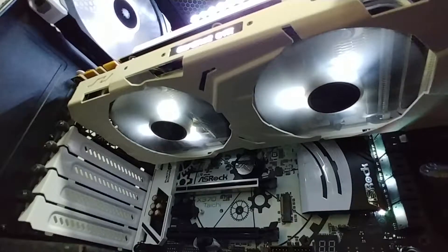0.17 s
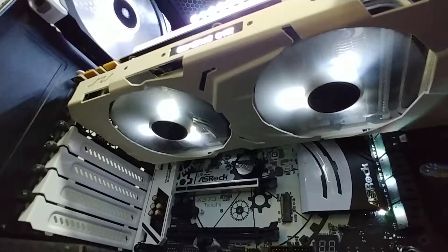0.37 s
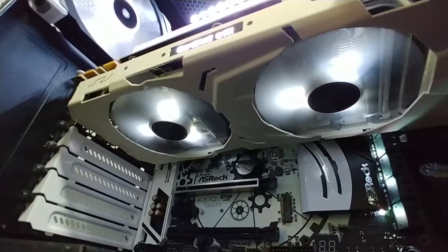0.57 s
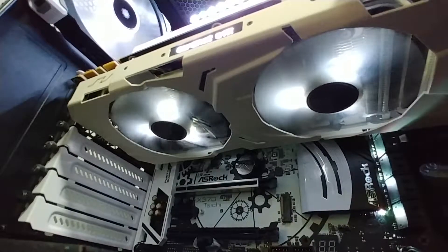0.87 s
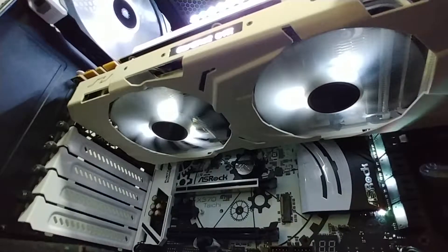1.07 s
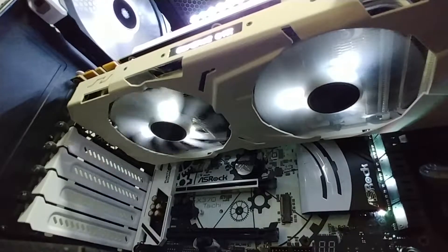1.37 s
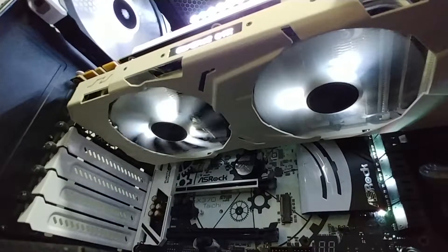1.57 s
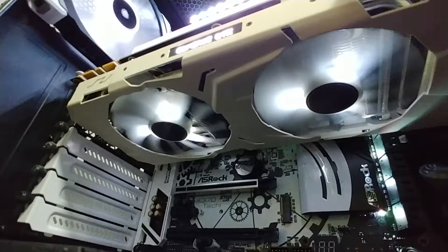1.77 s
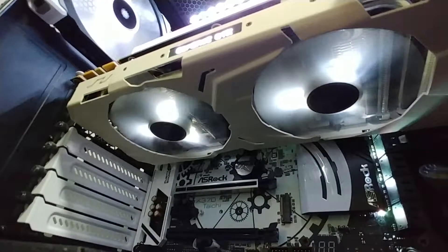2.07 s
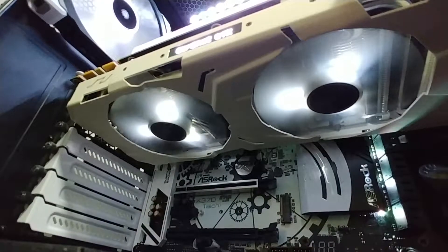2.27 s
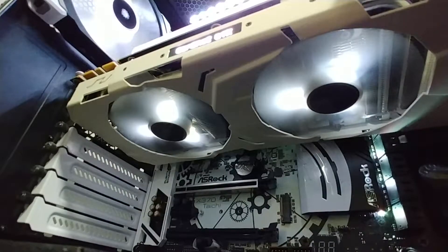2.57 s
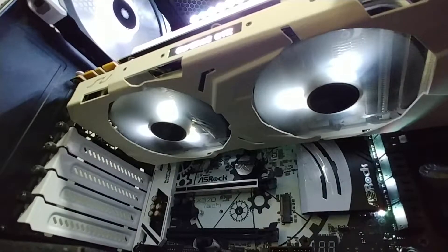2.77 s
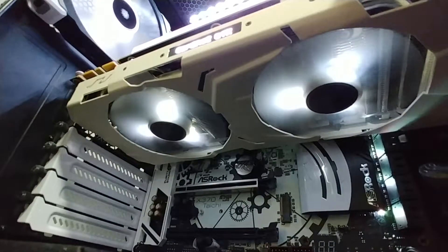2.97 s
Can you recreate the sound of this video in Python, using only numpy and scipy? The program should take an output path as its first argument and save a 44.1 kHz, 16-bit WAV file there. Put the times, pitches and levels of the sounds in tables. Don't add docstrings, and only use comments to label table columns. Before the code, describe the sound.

Computer cooling fans whir steadily up close, with two brief rattles of a clipping blade.

```python
import sys
import numpy as np
from scipy import signal
from scipy.fft import rfft, irfft, next_fast_len
from scipy.io import wavfile

SR = 44100
rng = np.random.default_rng(int(sys.argv[2]) if len(sys.argv) > 2 else 0)


def boost(x):
    u = np.asarray(x, float) / 20
    return 10 ** u


def materialize(psi):
    bounded = np.clip(np.atleast_2d(psi).T, -1, 1)
    quanta = np.round(bounded * 32767).astype(np.int16)
    wavfile.write(sys.argv[1], SR, quanta)


N = 138033

# start_s, peak_db, brightness_db_per_octave, face_knock_db
CLOCK_TICKS = [
    (0.601, -39.5, -1.5, 2),
    (1.5983, -41, 0, -4),
    (2.598, -43, 0, 2.5),
]
# pitch_hz, level_db, t60_s
CLOCK_MODES = [(1300, -14, .018), (1450, -11, .02), (2050, -17, .012), (3400, -13, .016), (3650, -11, .016),
               (3900, -15, .02), (4550, -15, .022), (5300, -15, .03), (5480, -9, .018), (7200, -21, .016),
               (7500, -19, .02), (8200, -26, .01)]
RECOIL_S, RECOIL_DB, STRIKE_S = .011, -12, .0015
ROOM_T60_S, ROOM_DB = .15, -7

# start_s, length_s, level_db, low_hz, high_hz
SCUFFS = [
    (2.178, .009, -59, 5500, 12000),
    (2.186, .016, -60, 5170, 10400),
    (2.202, .014, -60, 5500, 9300),
    (2.532, .018, -53, 4800, 5600),
    (2.533, .012, -66, 7300, 8500),
    (2.539, 0.011, -53, 4000, 4900),
    (2.638, 0.014, -54, 3000, 5600),
    (2.736, .01, -54.5, 3100, 3900),
]
# start_s, peak_db, left_lean_db, rebound_gap_s
BLADE_CLIPS = [(2.039, -46, -2, 0.0011), (2.1105, -40, -4, 0.0016), (2.1423, -36, -3, 0.0012),
               (2.1719, -34, -2, 0.0013), (2.2, -35, -3, 0.0012), (2.23, -44.5, 2, .0012),
               (2.3205, -45.5, 2, 0.0021), (2.351, -43, -3, .0018), (2.382, -38.5, -0.5, .0018),
               (2.41, -37.5, 0, 0.0017), (2.438, -38, -1, 0.0014)]
# pitch_hz, first_run_db, second_run_db, left_minus_right_db
SHROUD_MODES = [(2000, -20, -30, -9), (2420, -16.5, -19, -4), (2920, -11, -7.5, 1.5),
                (3260, -2.5, -11, -15), (3440, -14, -7, -5.5), (3660, -13, -11, -2), (3820, -11, -5.5, -2),
                (4117, -3, -5, -8), (4340, -9, -11.5, -4), (4780, -16, -17, -5), (5200, -14.5, -21, -1),
                (6090, -22, -21, -8)]
SECOND_RUN_S, REBOUND_DB = 2.28, -2.5
SHROUD_T60_S, SHROUD_SCATTER_DB, CASE_T60_S, CASE_DB = .02, 2.2, .09, -12
CONTACT_LOW_HZ, CONTACT_HIGH_HZ = 1800, 6500
# time_s, level_db
SHUDDER = [
    (2.09, -85),
    (2.13, -45),
    (2.2, -42.5),
    (2.3, -48),
    (2.36, -46),
    (2.45, -39.5),
    (2.5, -52.5),
    (2.56, -51.5),
]
# pitch_hz, width_hz, level_db
FRAME_MODES = [(364, 44, -1.5), (481, 68, 0), (588, 43, -4), (707, 86, -9), (1110, 370, -9.5),
               (1770, 510, -16)]

# time_s, level_db
DRAUGHT = [(0, -47.5), (.45, -41), (.65, -53), (.9, -46), (1.45, -46), (1.7, -40.5), (2.0, -49),
           (2.25, -47), (2.45, -43), (2.75, -41.5), (2.87, -41), (3.13, -35)]
DRAUGHT_LUMPY_DB, DRAUGHT_LOW_HZ, DRAUGHT_HIGH_HZ = -0.5, 38.4, 94
# centre_s, peak_db, pitch_hz
EDDIES = [(0.373, -25.5, 75.4), (0.391, -31, 76), (0.786, -21.5, 67.6), (0.824, -24, 67), (1.25, -26, 72),
          (1.625, -31, 50), (1.677, -28.5, 57), (2.01, -22.5, 63), (2.925, -22.5, 75), (2.944, -22, 90),
          (3.004, -20.5, 76), (3.085, -26, 56)]
EDDY_CYCLES, EDDY_LEAK_DB = .55, -30

# pitch_hz, level_db, wander_hz, left_minus_right_db
MOTOR_TONES = [(100.2, -45.5, 1.3, -3), (240, -58, .6, -6), (479, -65, 1.2, -4), (719.5, -73, 1.2, -2),
               (2400.3, -72.5, .3, -14), (2637, -78, .6, -8), (2880, -79, .2, -4), (4560, -85, .3, -3),
               (5760, -82, .3, -8), (8640, -92, .3, -2)]
HUM_SWING_DB = 3.5
# pitch_hz, width_hz, level_db, left_minus_right_db
CAVITIES = [(121.2, 10.5, -51.5, 5), (166, 42, -61.5, -7), (348, 9.8, -61, -10.5), (471, 72, -54, -4),
            (1096, 55, -62.5, -15), (1268, 56, -64.5, -20.5), (1710, 130, -71.5, 6.5),
            (2163, 66, -68.5, -17), (2625, 350, -75, 26), (3360, 280, -63, -7), (4400, 250, -77.5, 18),
            (4940, 220, -71, -2), (6070, 470, -85, -1)]
# pitch_hz, density_db_per_hz
AIR_LEFT = [(35, -141.5), (110, -75), (220, -72.5), (550, -81.5), (1900, -85.5), (2900, -106), (5200, -100),
            (12000, -121)]
# pitch_hz, density_db_per_hz
AIR_RIGHT = [(110, -65.5), (480, -77.5), (720, -86.5), (1200, -83.5), (3600, -89), (5200, -94),
             (6500, -105), (12000, -121)]
# pitch_hz, likeness_0_to_1
LIKENESS = [(50, 0.3), (120, 0.96), (450, 0.67), (700, 0.17), (1150, 0.46), (1900, 0.53), (5000, 0),
            (8500, 0)]
# pitch_hz, lag_rad
LEFT_LAG = [(60, -1.0), (450, 0.33), (720, 2.5), (1900, 3.5), (2300, 5), (2900, 10), (5200, 13.5),
            (12000, 26)]
MICROPHONE_TOP_HZ = 11000


def rms_one(x):
    return x / np.sqrt(np.mean(x ** 2) + 1e-20)


def at_hz(points, hz):
    table = np.array(points)
    return np.interp(np.log(hz), np.log(table[:, 0]), table[:, 1])


def band(x, low_hz, high_hz):
    return signal.sosfilt(signal.butter(2, [low_hz, high_hz], "band", fs=SR, output="sos"), x)


def pan(db):
    return boost(np.array([[db / 2], [-db / 2]]))


def drift(rate_hz):
    pole = np.exp(-80 * np.pi * rate_hz / SR)
    white = rng.standard_normal(N // 40 + 2002)
    slow = signal.lfilter([1], [1, -2 * pole, pole * pole], white)[2000:]
    return np.interp(np.arange(N) / 40, np.arange(len(slow)), rms_one(slow))


def ring(push, hz, t60):
    radius = boost(-60 / (t60 * SR))
    angle = 2 * np.pi * hz / SR
    return signal.lfilter([0, np.sin(angle)], [1, -2 * radius * np.cos(angle), radius ** 2], push + 1e-18)


def echoes(x, t60):
    t = np.arange(SR // 2) / SR
    tail = rng.standard_normal((2, len(t))) * boost(-60 * t / t60)
    tail = tail * (t > .003)
    tail = tail / np.sqrt(np.sum(tail ** 2, axis=1, keepdims=True))
    return signal.fftconvolve(x, tail, axes=1)[:, :N]


def clock():
    start_s, peak_db, bright_db, face_db = np.transpose(CLOCK_TICKS)
    t = np.arange(N) / SR
    out = np.zeros((2, N))
    strike_s = np.r_[start_s, start_s + RECOIL_S][:, None]
    pushes = np.sin(np.pi * np.clip((t - strike_s + .001) / STRIKE_S, 0, 1)) ** 2
    for hz, mode_db, t60 in CLOCK_MODES:
        cycles = hz * t + rng.random() + .05 * rng.standard_normal((2, 1))
        carrier = np.sin(2 * np.pi * cycles) * 4 / (STRIKE_S * SR)
        level_db = peak_db + mode_db + bright_db * np.log2(hz / 4000)
        level_db = level_db + face_db * (3000 < hz < 4000)
        both_db = np.r_[level_db, level_db + RECOIL_DB]
        strike = boost(both_db + rng.standard_normal(len(pushes))) @ pushes
        out += ring(strike * carrier, hz, t60)
    return pan(-1.5) * (out + boost(ROOM_DB) * echoes(out, ROOM_T60_S))


def scuffs():
    t = np.arange(N) / SR
    out = 0
    for start_s, length_s, db, low_hz, high_hz in SCUFFS:
        progress = np.clip((t - start_s) / length_s, 0, 1)
        envelope = np.sin(np.pi * progress ** 0.44) ** .5
        noise = rms_one(band(rng.standard_normal((2, N)), low_hz, high_hz))
        out = out + boost(db) * envelope * noise
    return out


def blade_clips():
    start_s, peak_db, lean_db, gap_s = np.transpose(BLADE_CLIPS)
    scatter = rng.standard_normal((len(start_s), len(SHROUD_MODES), 3))
    spread_s = rng.uniform(0, .0004, len(SHROUD_MODES))
    out = np.zeros((2, N))
    for k, (hz, first_db, second_db, side_db) in enumerate(SHROUD_MODES):
        mode_db = np.where(start_s < SECOND_RUN_S, first_db, second_db)
        side_levels_db = np.array([mode_db + side_db + lean_db, mode_db])
        clicks = np.zeros((2, N))
        for touch in range(3):
            delay_s = touch * np.round(gap_s * hz) / hz
            at = ((start_s + 0.00045 + delay_s + spread_s[k]) * SR).astype(int)
            touch_db = peak_db + touch ** 2 * REBOUND_DB + SHROUD_SCATTER_DB * scatter[:, k, touch]
            clicks[:, at] = boost(touch_db + side_levels_db)
        out += ring(clicks, hz, SHROUD_T60_S)
    for _ in range(2):
        out = band(out, CONTACT_LOW_HZ, CONTACT_HIGH_HZ)
    return out + boost(CASE_DB) * echoes(out, CASE_T60_S)


def frame_shudder():
    level_db = np.interp(np.arange(N) / SR, *np.transpose(SHUDDER))
    shake = rng.standard_normal(N)
    frame = 0
    for hz, width_hz, db in FRAME_MODES:
        frame = frame + boost(db) * rms_one(band(shake, hz - width_hz / 2, hz + width_hz / 2))
    return boost(level_db - 6.5 + 0.59 * drift(38)) * frame * pan(-2.5)


def draught():
    t = np.arange(N) / SR
    level_db = np.interp(t, *np.transpose(DRAUGHT)) + DRAUGHT_LUMPY_DB * drift(2.3)
    out = boost(level_db) * rms_one(band(rng.standard_normal(N), DRAUGHT_LOW_HZ, DRAUGHT_HIGH_HZ))
    for centre_s, db, hz in EDDIES:
        cycles = (t - centre_s) * hz
        out = out + boost(db) * np.sin(2 * np.pi * cycles) * np.exp(-(cycles / EDDY_CYCLES) ** 2)
    return out * [[boost(EDDY_LEAK_DB)], [1]]


def motors():
    out = 0
    for hz, db, wander_hz, side_db in MOTOR_TONES:
        phase = 2 * np.pi * (np.cumsum(hz + wander_hz * drift(3.7)) / SR + rng.random())
        level = np.sqrt(2) * boost(db + HUM_SWING_DB * drift(9))
        out = out + level * pan(side_db) * np.sin(phase)
    return out


def cavities():
    white = rng.standard_normal((2, N))
    out = 0
    for k, (hz, width_hz, db, side_db) in enumerate(CAVITIES):
        t60 = np.log(1000) / np.pi / width_hz
        out = out + boost(db) * pan(side_db) * rms_one(ring(white[k % 2], hz, t60))
    return out


def air(patchy_db):
    edges = 22 * 2 ** np.arange(0, 9.4, 1 / 3)
    white = rng.standard_normal((2, 2, N))
    out = 0
    for k, (low_hz, high_hz) in enumerate(zip(edges, edges[1:])):
        mid, side = band(white[k % 2], low_hz, high_hz)
        hz = np.sqrt(low_hz * high_hz)
        alike = np.clip(at_hz(LIKENESS, hz), -1, 1)
        left_db = at_hz(AIR_LEFT, hz)
        right_db = at_hz(AIR_RIGHT, hz) if hz > AIR_RIGHT[0][0] else left_db
        gain = boost(np.array([[left_db], [right_db]]) + patchy_db * drift(7.7))
        out = out + gain * (np.sqrt(1 + alike) * mid + np.sqrt(1 - alike) * side * [[1], [-1]])
    return out * np.sqrt(SR) / 2


def lagged(x):
    size = next_fast_len(N + SR // 10)
    hz = np.arange(size // 2 + 1) * SR / size + 1
    turn = np.exp(-1j * at_hz(LEFT_LAG, hz))
    left = irfft(rfft(x[0], size) * turn, size)[:N]
    return np.array([left, x[1]])


def scene():
    impacts = scuffs() + blade_clips() + frame_shudder()
    fans = lagged(motors() + cavities() + air(patchy_db=1.22))
    return clock() + impacts + draught() + fans


def band_limit(x):
    return signal.sosfilt(signal.butter(12, 12210, fs=SR, output="sos"), x)


def record(dry):
    rolloff = signal.butter(4, MICROPHONE_TOP_HZ, fs=SR, output="sos")
    mix = signal.sosfilt(rolloff, dry)
    return band_limit(mix)


dry = scene()
out = record(dry)
materialize(out)
```